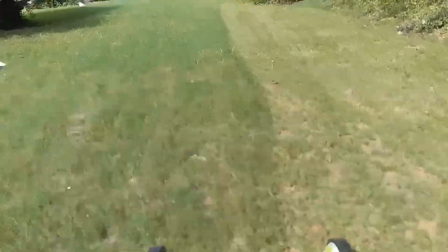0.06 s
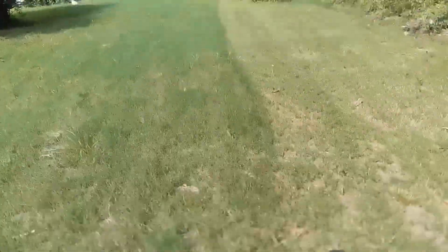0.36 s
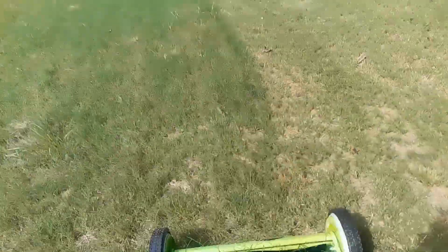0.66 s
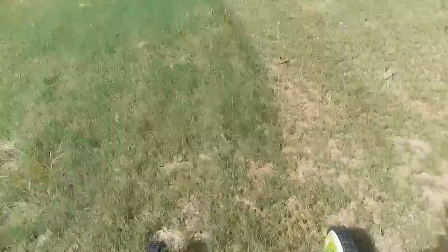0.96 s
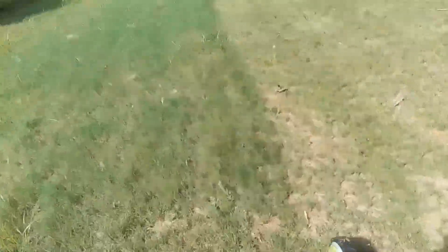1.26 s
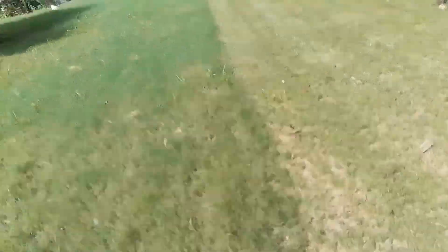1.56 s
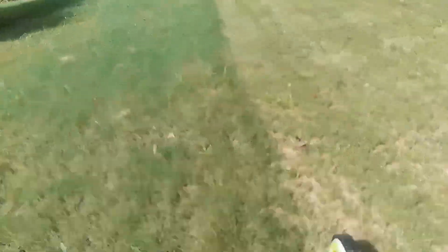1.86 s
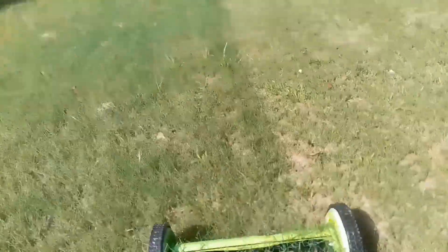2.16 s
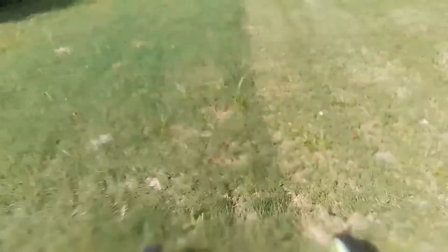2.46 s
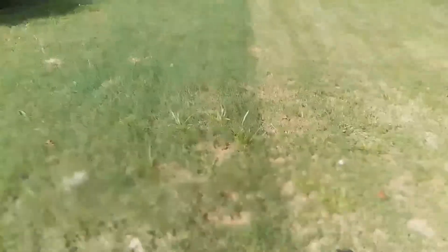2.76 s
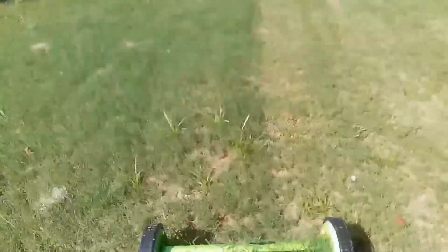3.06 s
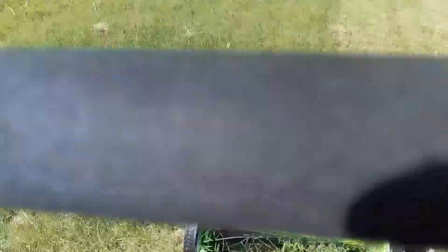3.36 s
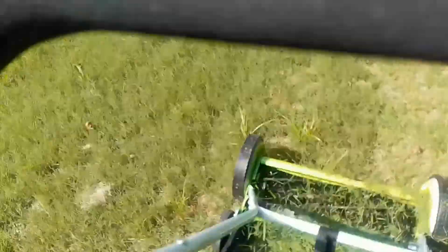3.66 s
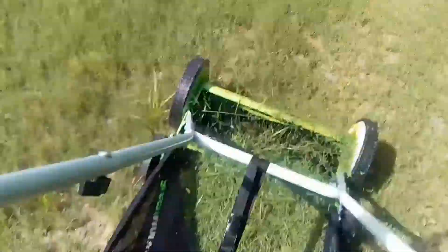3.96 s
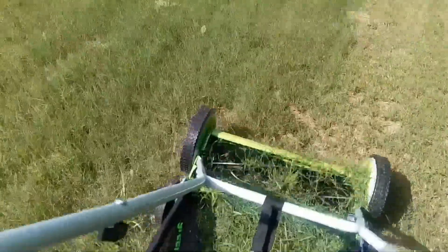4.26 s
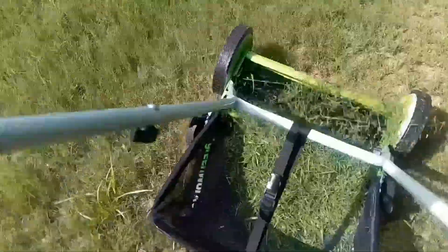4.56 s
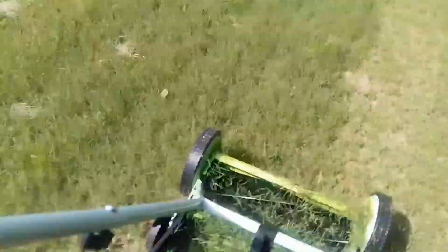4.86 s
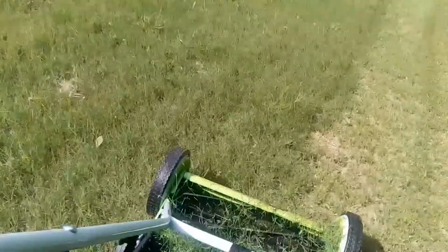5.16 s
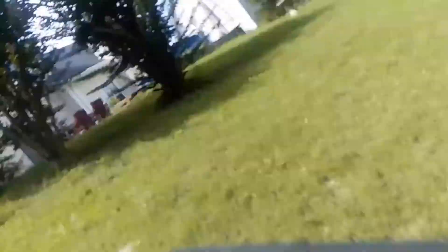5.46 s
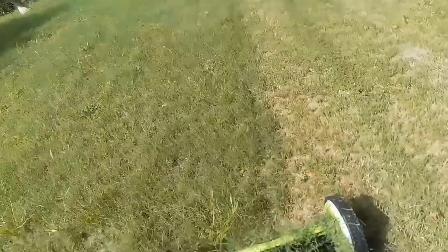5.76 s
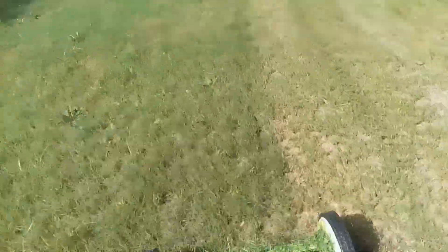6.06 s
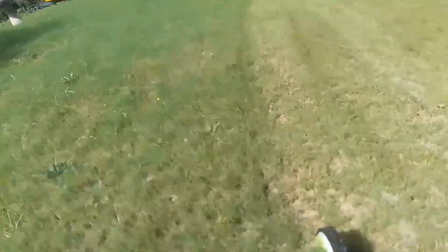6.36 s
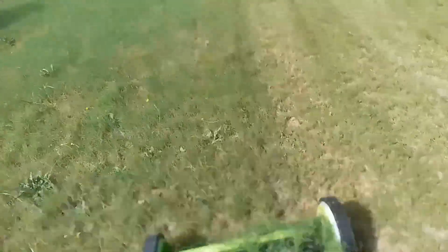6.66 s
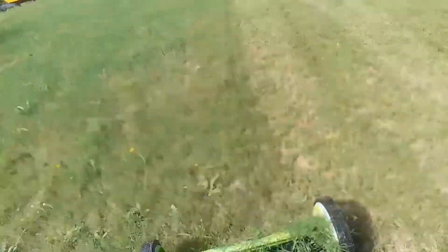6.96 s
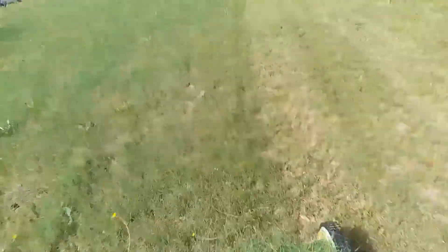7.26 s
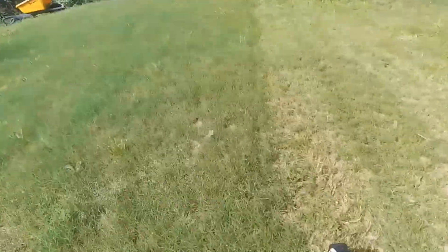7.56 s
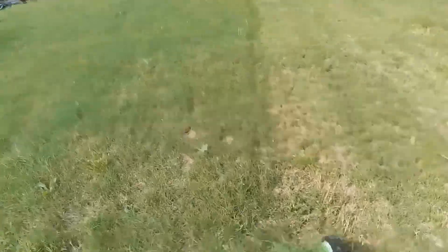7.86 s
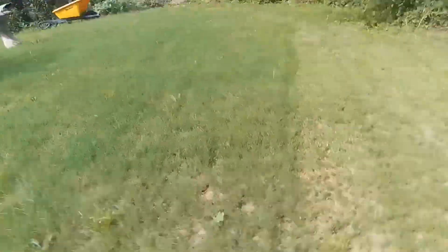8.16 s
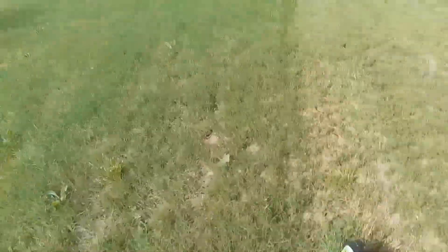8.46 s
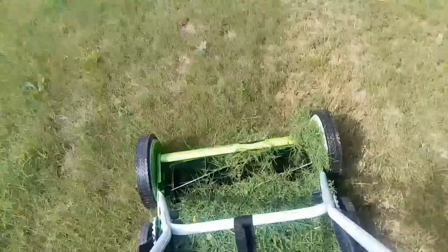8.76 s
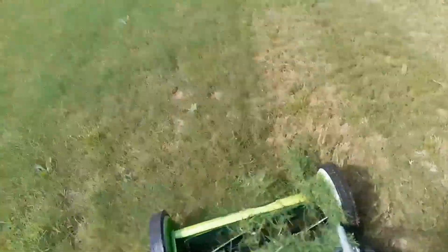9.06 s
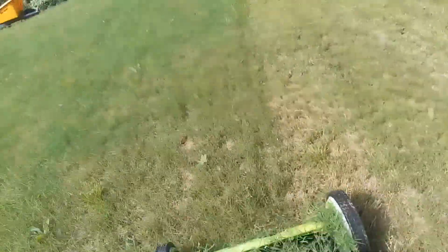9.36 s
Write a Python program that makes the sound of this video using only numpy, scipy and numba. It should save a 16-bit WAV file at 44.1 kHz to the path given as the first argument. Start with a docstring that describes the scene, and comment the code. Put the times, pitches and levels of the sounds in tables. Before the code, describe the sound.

A push reel mower is already rolling over a lawn, heard close from the handle and slightly overloaded. Its blades scrape steel in a fast, bright, hissing pulse, over chattering gears, a rattling frame, light wheel bumps and the crisp snapping of grass. A blade pings at about 1 second, and the reel speeds up around 2. Thin squeals come and go, with a sharper squeak and scrape near 3.3 seconds and a few more pings between 4 and 4.5. The cutting hiss swells from about 4.5 to 5.8 seconds and again from 6.4 to 7.6. Around 8.3 seconds the mower slows with a sharp clack and stops by 8.5. In the pause the blades ring out, the ratchet ticks and dry grass rustles softly over faint outdoor air. At about 9.3 seconds a knock and brief squeal set the mower scraping and cutting again.

```python
"""Push reel mower on a lawn

Heard at the handle, the mower is walked along, halts for about a second and is shoved off again.
Once a turn the tightest blade scrapes the bed knife; gears chatter in the steel frame, wheels jolt
the catcher, grass snaps. At the halt the reel rings on and the pawls tick.
Overload flattens the peaks; now and then the rush thins to a few tones."""
import sys
import numpy as np
from scipy import signal
from scipy.fft import rfft, irfft, next_fast_len
from scipy.io import wavfile
from numba import njit

SR = 44100
rng = np.random.default_rng(int(sys.argv[2]) if len(sys.argv) > 2 else 0)


def store_wav(level_fs):
    """Save 16-bit WAV to argv[1]."""
    pcm = np.round(np.clip(np.atleast_2d(level_fs), -1, 1) * 32767)
    wavfile.write(sys.argv[1], SR, pcm.T.astype(np.int16))


N = 423801
TIME_S = np.arange(N) / SR
FREQ_HZ = np.maximum(np.fft.rfftfreq(next_fast_len(N + SR // 2, real=True), 1 / SR), 1)

# outdoor air spectrum (frequency [Hz], gain [dB])
YARD_SPECTRUM = [(18, -52), (30, 0), (90, -3), (240, 2), (581, 1), (698, -21), (774, 2), (1480, -6),
                 (2370, 1.5), (5170, -11), (8040, 0), (15000, -18)]
# crushed dry grass spectrum (frequency [Hz], gain [dB])
RUSTLE_SPECTRUM = [(100, -4), (400, 0), (900, -9), (2400, -4.5), (4000, -17), (6500, -20), (8200, -3.5),
                   (11000, -21), (16000, -32)]
# shoes and catcher shift at the halt (centre [s], length [s], level [dB])
SHUFFLE_SPANS = [(8.594, 0.081, -40.5), (8.803, 0.1, -41.5), (8.92, .14, -49), (9.08, 0.21, -36.5)]
# knocks and ticks (time [s], level [dB], ring [Hz], t60 [s], crack re ring [dB])
CLICK_EVENTS = [(5.739, -30, 111, 0.14, -23), (8.175, -30, 185, 0.1, -20), (8.319, -10, 2110, 0.039, -10),
                (8.328, -27, 125, 0.12, -22), (8.43, -33, 105, .22, -26), (8.69, -46, 698, 0.47, -25),
                (8.757, -21.5, 2430, 0.015, -1), (8.792, -37, 6500, .02, -2), (8.845, -40, 115, 0.093, -15),
                (8.871, -35, 420, .05, -6), (9.008, -41, 4900, 0.035, 6), (9.237, -38, 4340, 0.052, 3),
                (9.285, -37, 4400, 0.047, 3), (9.317, -37, 3360, 0.082, 9.5), (9.345, -15, 522, 0.063, -15)]
# hard objects hit a blade (time [s], relative level [dB])
BLADE_STRIKES = [(1.05, -19), (1.69, -28), (4.14, -20.5), (4.39, -23), (4.49, -22), (8.24, -17),
                 (8.38, -20.5)]
# reel blade modes (frequency [Hz], gain [dB], t60 at rest [s])
BLADE_MODES = [(684, -13.5, 1.5), (864, 5.5, 0.47), (1220, -1.5, 0.62), (1430, -5, 0.46)]
# reel speed (time [s], speed [turns/s])
REEL_SPEED = [(0.0, 22.4), (0.4, 24.7), (0.95, 20.8), (1.25, 22.4), (1.6, 21.08), (2.0, 30.97),
              (2.4, 25.93), (3.4, 27.52), (3.6, 22.6), (4.0, 26.36), (4.2, 21.75), (4.9, 21.17),
              (5.15, 25.37), (6.3, 24.58), (6.55, 29.28), (7.45, 27.84), (8.2, 20.0), (8.52, 0), (9.315, 0),
              (9.365, 22), (9.61, 25)]
# push loading gears and wheels (time [s], force re easy walk [dB])
PUSH_FORCE = [(0, -0.7), (.9, 0.7), (1.6, 0.6), (2.4, 0), (3.25, 0), (3.5, -3.5), (4.9, -3), (5.35, -3),
              (5.6, -4), (5.77, 1.4), (6.4, 0), (7.1, 1.75), (7.8, 1.5), (8.0, 4.9), (8.2, 2), (8.5, 1.5),
              (9.35, 1), (9.61, 4)]
# ground bumps (centre [s], length [s], added push [dB])
GROUND_BUMPS = [(.87, 0.14, 2), (2.26, 0.18, 2.1), (6.77, 0.24, 1), (8.29, 0.082, 2.5), (8.321, 0.018, 3),
                (9.53, 0.093, 2)]
# microphone path (time [s], place [0 first grip, 1 raised, 2 second grip])
MIC_PLACE = [(3.3, 0), (3.55, 1), (5.95, 1), (6.2, 2), (7.85, 2), (8.2, 1.1), (9.2, 1), (9.4, 1.8)]
# wheel and catcher modes (frequency [Hz], nominal width [Hz], gain at places 0, 1, 2 [dB])
CATCHER_MODES = [(112, 50, -35, -44, -39), (215, 81, -24, -30, -22), (267.4, 20, -24, -25.5, -15.5),
                 (346, 34, -14, -11.5, -20), (458.3, 21, -10, -10, -5), (504.4, 56, -2.5, -5.5, 0.5),
                 (562.3, 54, -6.5, -7, -8.5), (733, 120, -4, -4, -5.5)]
# steel frame and handle modes (frequency [Hz], nominal width [Hz], gain at places 0, 1, 2 [dB])
FRAME_MODES = [(878.3, 110, -17, -13.5, -17.5), (1047, 110, -17.5, -16, -12),
               (1131, 110, -20, -14.5, -17.5), (1242, 62, -29, -30, -15), (1294, 110, -15, -15, -15),
               (1417, 59, -17.5, -17, -6.5), (1472, 60, -17, -23, -13.5), (1584, 260, -11, -10.5, -12.5),
               (2046, 76, -12.5, -13.5, -10.5), (2234, 95, -14.5, -16.5, -11.5),
               (2420, 130, -14.5, -14, -15.5), (2512, 85, -12, -15, -12.5), (2618, 76, -14, -14, -10.5),
               (2727, 60, -11.5, -8.5, -8), (3032, 120, -14, -17, -10), (3286, 100, -11.5, -21.5, -7.5),
               (3418, 64, -10.5, -14, -5.5), (3728, 110, -13.5, -18, -9.5), (3956, 480, -15, -12.5, -16)]
# the cutting hiss swells in lush grass and dips elsewhere, as briefly around 2.7 s
# (centre [s], length [s], cut amount [0 ordinary, + louder, - quieter])
CUT_SPANS = [(.3, 0.8, 0.25), (1.1, 0.61, -0.33), (2.1, 0.4, -0.045), (2.68, 0.31, -0.56),
             (3.52, 0.15, 0.72), (5.02, 1.17, 0.81), (5.72, 0.18, 0.65), (6.02, 0.15, -0.56),
             (7.0, 1.22, 0.75), (7.88, .28, -0.0061), (8.31, 0.49, -1.05)]
# snapping stalk spectrum (frequency [Hz], gain [dB])
SNAP_SPECTRUM = [(200, -35), (700, -19), (1200, 0), (1850, 0), (2600, 5.5), (4000, 3.5), (4650, 3),
                 (6400, 4.5), (8000, -1), (10500, -9), (16000, -5)]
# resonances of stalks wedged on the knife (frequency [Hz], stage width [Hz], gain [dB])
RASP_BANDS = [(3534, 290, 5.5), (4040, 360, 2), (6260, 570, -3.5)]
# short bright scrapes on the knife, including the first blade scrapes at the restart
# (centre [s], length [s], pitch [Hz], stage width [Hz], level [dB])
BRIGHT_SCRAPES = [(1.251, 0.41, 5380, 500, -19.5), (3.43, 0.18, 7250, 1900, -10.5),
                  (3.57, 0.35, 6050, 1400, -19), (3.92, 0.53, 5430, 1100, -19.5),
                  (3.95, 0.53, 6260, 500, -25), (4.473, 0.73, 5390, 500, -21), (5.22, 0.55, 6200, 800, -18),
                  (5.68, 0.36, 7100, 1600, -20), (6.4, 0.15, 6250, 600, -19.5), (6.58, .1, 8100, 1680, -13),
                  (6.85, 0.31, 6580, 650, -21), (7.153, 0.31, 8000, 300, -19),
                  (7.54, 0.23, 6560, 545, -16.5), (8.29, .14, 9200, 900, -23),
                  (8.37, 0.024, 8550, 1100, -18), (8.412, 0.051, 7650, 1510, -23),
                  (9.372, .014, 7850, 1300, -11), (9.425, .016, 7600, 2450, -7),
                  (9.533, 0.061, 8200, 1500, -9)]
# steel squeals (centre [s], length [s], pitch [Hz], nominal level [dB])
SQUEAL_SPANS = [(0.846, 1.5, 5540, -34), (1.3, 0.25, 2050, -28), (2.3, 0.17, 2050, -35),
                (2.65, 2.3, 5450, -30), (2.4, 1.6, 9480, -34), (3.3, .13, 2050, -18),
                (4.75, 0.56, 2085, -27), (6.75, 1.1, 1460, -32), (6.906, 0.88, 6960, -25.5),
                (6.597, .6, 5157, -39), (9.43, .07, 1460, -18), (9.45, .06, 3520, -13)]
# high spot grazes the knife harder or softer (centre [s], length [s], gain [dB])
GRAZE_SPANS = [(.13, 0.33, 8), (.56, .4, 13.5), (.9, 0.13, 15), (1.28, 0.24, 7), (1.92, 0.13, 12),
               (2.27, 0.064, 13), (2.68, 0.29, 7), (3.05, 0.49, 7.5), (3.85, 0.17, 6), (4.24, 0.18, 10.5),
               (5.58, 0.17, -18), (7.0, 2, 9), (7.87, 0.39, 7.5), (8.265, 0.032, 5), (8.39, .15, -24),
               (9.52, 0.22, -3)]
# blade pressure on the knife (time [s], scrape gain [dB])
BLADE_PRESSURE = [(0, -14.5), (.13, -10), (1.6, -11.5), (2.05, -6), (2.9, -9.5), (3.45, -9.5),
                  (4.25, -14.5), (4.9, -17.5), (5.4, -17), (5.5, -9.5), (5.95, -10.5), (6.35, -17.5),
                  (7.55, -16), (7.8, -19), (8.2, -20), (8.42, -19), (9.32, -43), (9.37, -17.5),
                  (9.61, -20.5)]
# bed knife modes (frequency [Hz], nominal width [Hz], gain at places 0, 1, 2 [dB])
KNIFE_MODES = [(5076, 270, -18, -17, -18.5), (5518, 67, -17.5, -20.5, -38), (6507, 350, -17.5, -10.5, -10),
               (7480, 290, -11.5, -15.5, -13.5), (8243, 100, -13, -7, -17), (8223, 590, -7.5, -6.5, -3.5),
               (8730, 380, -8.5, -8, -8), (9460, 100, -17.5, -22, -23), (9860, 900, -18, -19, -6)]
# the rush thins to tones (centre [s], length [s], dip [dB])
THIN_SPANS = [(0.08, 0.01, 19), (0.353, 0.015, 10), (0.634, 0.013, 19), (1.494, 0.012, 18),
              (1.747, 0.017, 12), (2.318, 0.018, 18), (2.407, 0.011, 15), (2.569, .026, 41),
              (2.624, 0.01, 19), (2.741, 0.014, 28), (2.803, 0.024, 36), (2.92, 0.016, 14),
              (3.194, 0.013, 19), (4.031, 0.013, 11), (4.311, 0.014, 19), (4.989, 0.016, 18),
              (5.828, 0.016, 17), (6.254, 0.014, -2), (6.522, 0.012, 17), (6.676, 0.016, 18),
              (6.865, 0.017, 28), (6.924, 0.011, 13), (7.022, 0.015, 10), (7.138, 0.016, 13),
              (7.36, 0.013, 13), (7.616, 0.0093, 8), (7.68, 0.014, 9), (9.448, 0.011, 13),
              (9.501, .016, 16)]


def undb(db):
    """Decibels to gain."""
    return 10 ** (np.asarray(db) / 20)


def unit(x):
    """Scale to rms 1."""
    return x / np.sqrt(np.mean(x ** 2))


def curve(table):
    """Linear interpolation of (time [s], value) rows."""
    return np.interp(TIME_S, *np.transpose(table))


def swell(centre_s, length_s):
    """Rounded, flat-topped window of height 1."""
    return np.exp(-np.square(np.square(2 * (TIME_S - centre_s) / length_s)))


def swells(table):
    """Sum of (centre [s], length [s], height) windows."""
    return sum(height * swell(centre_s, length_s) for centre_s, length_s, height in table)


def filtered(x, response):
    """Apply a response given on FREQ_HZ."""
    return irfft(rfft(x, 2 * (len(FREQ_HZ) - 1)) * response)[:N]


def colour(x, spectrum):
    """Shape by (frequency [Hz], gain [dB]) points."""
    hz, db = np.transpose(spectrum)
    return filtered(x, undb(np.interp(np.log(FREQ_HZ), np.log(hz), db)))


def wander(rate_hz):
    """Smooth random curve, rms 1."""
    return unit(np.interp(TIME_S * rate_hz, np.arange(8192), rng.standard_normal(8192)))


def grains(rate_hz, spread_db):
    """Tiny random impacts of uneven strength."""
    struck = rng.random(N) < rate_hz / SR
    polarity = np.sign(rng.standard_normal(N))
    return unit(struck * polarity * undb(spread_db * np.minimum(rng.exponential(size=N), 4)))


@njit
def bandpass(x, hz, width_hz):
    """State-variable band-pass stage with a moving centre."""
    y, band, low = np.empty(len(x)), 0., 0.
    for i in range(len(x)):
        g, damping = np.tan(np.pi * hz[i] / SR), width_hz / hz[i]
        v = (band + g * (x[i] - low)) / (1 + g * (g + damping))
        band, low = 2 * v - band, low + 2 * g * v
        y[i] = damping * v
    return y


def throb(turns, moving, at_turn, sharpness, depth_db, scatter_db):
    """Gain with random scatter and a peak of about depth_db once a turn; flat at rest."""
    contact = np.exp(sharpness * (np.cos(2 * np.pi * (turns - at_turn)) - 1))
    return unit(undb(moving * (depth_db * (contact - contact.mean()) + scatter_db * wander(55))))


def knocked(modes, force, reel_hz, rate_hz, width_scale, drift, flicker_db):
    """Dense knocks all over a part: each mode gets its own share, swells and drifts alone."""
    place_s, place = np.transpose(MIC_PLACE)
    slack = np.clip(1 - reel_hz / 20, 0, 1)
    out = 0
    for hz, width_hz, *place_db in modes:
        knocks = np.zeros(N)
        hits = rng.integers(0, N, int(rate_hz * N / SR))
        knocks[hits] = rng.standard_normal(len(hits))
        ring = unit(bandpass(knocks * force, hz * (1 + drift * wander(9)), width_scale * width_hz))
        heard_db = np.interp(TIME_S, place_s, np.interp(place, np.arange(len(place_db)), place_db))
        dull_db = 18 * slack * np.clip(np.log2(hz / 1800), 0, 1)  # slow reel: soft knocks, less treble
        out = out + ring * undb(heard_db - dull_db + flicker_db * wander(12))
    return out


def yard(level_db=-45):
    """Faint outdoor air."""
    return unit(colour(rng.standard_normal(N), YARD_SPECTRUM)) * undb(level_db + wander(3.2))


def rustle():
    """Shoes and catcher softly crush dry grass."""
    weight = swells([(centre_s, length_s, undb(db)) for centre_s, length_s, db in SHUFFLE_SPANS])
    return unit(colour(grains(rate_hz=2100, spread_db=3.5), RUSTLE_SPECTRUM)) * weight


def clicks():
    """Wheels thump, pawls drop, a blade is touched, slack is taken up: a crack and a short ring."""
    out = np.zeros(N)
    age_s = TIME_S[:SR // 5]
    contact_lowpass = signal.butter(1, 5000, fs=SR)
    for time_s, db, hz, t60_s, crack_db in CLICK_EVENTS:
        start = int(time_s * SR)
        crack = unit(signal.lfilter(*contact_lowpass, rng.standard_normal(len(age_s))))
        ring = unit(np.sin(2 * np.pi * hz * age_s))
        out[start:start + len(age_s)] += (ring + undb(crack_db) * crack) * undb(db - 60 * age_s / t60_s)
    return out


def reel_ring(moving, level_db=-4):
    """Struck blades ring in beating pairs, no two alike; grass and knife damp them while turning."""
    out = np.zeros(N)
    age_s = TIME_S[:SR]
    for time_s, strike_db in BLADE_STRIKES:
        start = int(time_s * SR)
        damped_age_s = np.cumsum(1 + 0.3 * moving[start:start + SR]) / SR
        for hz, mode_db, t60_s in BLADE_MODES:
            beat_hz = rng.uniform(2, 21)
            pair = np.sin(2 * np.pi * hz * age_s) + 0.35 * np.sin(2 * np.pi * (hz + beat_hz) * age_s)
            ring_db = level_db + strike_db + mode_db - 60 * damped_age_s / t60_s
            out[start:start + SR] += undb(ring_db) * pair
    return out


def jolts(reel_hz):
    """Wheels bump over uneven turf and drum on the catcher."""
    turf = unit(undb(1.8 * wander(6.1) + 2 * wander(36)))
    return knocked(CATCHER_MODES, turf, reel_hz,
                   rate_hz=600, width_scale=0.75, drift=0.0123, flicker_db=0.5)


def chatter(turns, reel_hz, moving):
    """Gear teeth and loose joints knock the frame, hardest about 0.4 turn after the scrape."""
    force = throb(turns, moving, at_turn=0.32, sharpness=0.68, depth_db=2, scatter_db=1.15)
    return knocked(FRAME_MODES, force, reel_hz, rate_hz=700, width_scale=0.48, drift=0.007, flicker_db=2)


def cutting(turns, moving):
    """Stalks snap in bunches as the blades sweep them against the knife."""
    snaps = grains(rate_hz=11000, spread_db=0.5)
    bunches = throb(turns, moving, at_turn=-0.019, sharpness=2.8, depth_db=4, scatter_db=3)
    return unit(colour(snaps * bunches, SNAP_SPECTRUM))


def rasp(moving, cut_amount, lush_db=-13.5):
    """In lush grass, wedged stalks drag unevenly along the knife."""
    drag = grains(rate_hz=2500, spread_db=0.5) * undb(5 * moving * wander(55))
    response = sum(undb(db) / (1 + 2j * (FREQ_HZ - hz) / width_hz) ** 2
                   for hz, width_hz, db in RASP_BANDS)
    return unit(filtered(drag, response)) * np.maximum(cut_amount, 0) ** 3.5 * undb(lush_db)


def bright_scrapes(moving):
    """Short, uneven scrapes make the knife sing a bright, wavering note."""
    drag = grains(rate_hz=5000, spread_db=2) * undb(4 * moving * wander(55))
    waver = 1 + 0.018 * wander(30)
    out = np.zeros(N)
    for centre_s, length_s, hz, width_hz, db in BRIGHT_SCRAPES:
        near = np.abs(TIME_S - centre_s) < length_s
        pitch_hz = hz * waver[near]
        ring = bandpass(bandpass(drag[near], pitch_hz, width_hz), pitch_hz, width_hz)
        out[near] += unit(ring) * undb(db) * swell(centre_s, length_s)[near]
    return out


def squeals(turns, moving):
    """Steel rubs on steel: thin, unsteady notes in rough bursts, about one a turn."""
    rub = throb(turns, moving, at_turn=0.4, sharpness=1, depth_db=11, scatter_db=5.5)
    roughness = undb(3.9 * wander(260))
    wavering_s = np.cumsum(1 + 0.0046 * wander(30) + 0.006 * wander(400)) / SR
    notes = sum(undb(db) * swell(centre_s, length_s) * np.sin(2 * np.pi * hz * wavering_s)
                for centre_s, length_s, hz, db in SQUEAL_SPANS)
    return rub * roughness * notes


def ping(turns):
    """A high spot on the reel grazes the knife once a turn: a short rising ping with one overtone."""
    offset_turns = (turns - 0.49 + 0.5) % 1 - 0.5
    pitch_hz = 2660 + 400 * offset_turns + 70 * wander(25) + 70 * wander(500)
    touch = np.exp(-(offset_turns / 0.14) ** 2) * undb(4 * wander(25) + 2 * wander(350))
    phase = 2 * np.pi * np.cumsum(pitch_hz) / SR
    overtone = undb(-6.5 + 1.6 * wander(40)) * np.sin(1.29 * phase)
    return unit(touch * (np.sin(phase) + overtone)) * undb(swells(GRAZE_SPANS))


def scrape(turns, reel_hz, moving, cut_amount):
    """The tight blade slips over the bed knife once a turn: a wavering shriek plus knife modes."""
    centre_hz, width_hz, sag_hz = 8220, 1940.0, 779.4  # lush grass cushions the knife: pitch sags
    pitch_hz = np.clip(centre_hz - sag_hz * cut_amount + 330 * wander(160), 5000, 11000)
    contact = throb(turns, moving, at_turn=-0.057, sharpness=6, depth_db=7.5, scatter_db=2)
    friction = bandpass(rng.standard_normal(N), pitch_hz, width_hz)
    shriek = unit(bandpass(friction, pitch_hz, width_hz)) * contact
    knife = knocked(KNIFE_MODES, contact, reel_hz,
                    rate_hz=4000, width_scale=0.6, drift=0.0053, flicker_db=1.36)
    return undb(-4) * shriek + undb(-2) * knife


def thin_out(x, size=4096, tone_count=8, tones_db=-1, spacing_hz=560, window_s=0.018):
    """The rush drops away briefly; only its strongest tones ring on."""
    out = x.copy()
    offset_s = (np.arange(size) - size // 2) / SR
    for centre_s, length_s, dip_db in THIN_SPANS:
        span = int(centre_s * SR) - size // 2 + np.arange(size)
        spectrum = rfft(x[span] * np.exp(-np.square(offset_s / window_s)))
        peaks = signal.find_peaks(np.abs(spectrum), distance=spacing_hz * size / SR)[0]
        strongest = peaks[np.argsort(-np.abs(spectrum[peaks]))[:tone_count]]
        kept = np.isin(np.arange(len(spectrum)), strongest)
        tones = unit(irfft(spectrum * kept)) * np.std(x[span]) * undb(tones_db)
        rush_gain = undb(-dip_db * np.exp(-np.abs(offset_s / (0.55 * length_s)) ** 2.9))
        out[span] = rush_gain * out[span] + (1 - rush_gain) * tones
    return out


def scene():
    """Reel speed, push and cut amount drive the mower, over faint outdoor air."""
    scrape_db, ping_db, chatter_db, jolt_db, cut_db, cut_swing_db = 2, -28, -14, -27.5, -17, 3
    walking_reel_hz = 22.4
    reel_hz = curve(REEL_SPEED)
    turns = np.cumsum(reel_hz) / SR
    moving = np.clip(reel_hz / 4, 0, 1)
    pace = np.clip(reel_hz / walking_reel_hz, 0, 1)
    push = undb(curve(PUSH_FORCE) + swells(GROUND_BUMPS))
    cut_amount = swells(CUT_SPANS)
    drive = push * pace ** 0.81
    pressure = undb(scrape_db + curve(BLADE_PRESSURE)) * pace ** 0.49
    feed = undb(cut_db + cut_swing_db * cut_amount) * push ** 0.59 * pace
    blades = scrape(turns, reel_hz, moving, cut_amount) * pressure
    blades += ping(turns) * drive * pace * undb(ping_db)
    blades += squeals(turns, moving)
    body = chatter(turns, reel_hz, moving) * drive * undb(chatter_db)
    body += jolts(reel_hz) * push ** 1.98 * pace ** 0.25 * undb(jolt_db)
    grass = cutting(turns, moving) * feed + rasp(moving, cut_amount)
    mower = moving * (blades + body + grass + bright_scrapes(moving)) + reel_ring(moving) + clicks()
    return np.tile(mower + rustle() + yard(), (2, 1))


def record(dry):
    """Input overload flattens the peaks; the sound thins at moments; rumble and top are cut."""
    ceiling, knee, low_cut_hz, high_cut_hz = 0.58, 12, 135, 15750
    oversampled = signal.resample_poly(dry[0], up=2, down=1)
    clipped = oversampled / (1 + np.abs(oversampled / ceiling) ** knee) ** (1 / knee)
    low_cut = signal.butter(2, low_cut_hz, "high", fs=SR, output="sos")
    mono = signal.sosfilt(low_cut, signal.resample_poly(clipped, up=1, down=2))
    high_cut = 1 / (1 + (FREQ_HZ / high_cut_hz) ** 300)
    return np.tile(filtered(thin_out(mono), high_cut), (2, 1))


dry = scene()
out = record(dry)
store_wav(out)
```